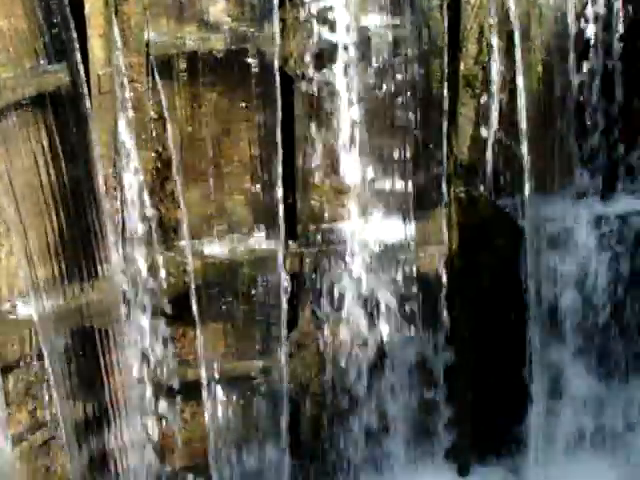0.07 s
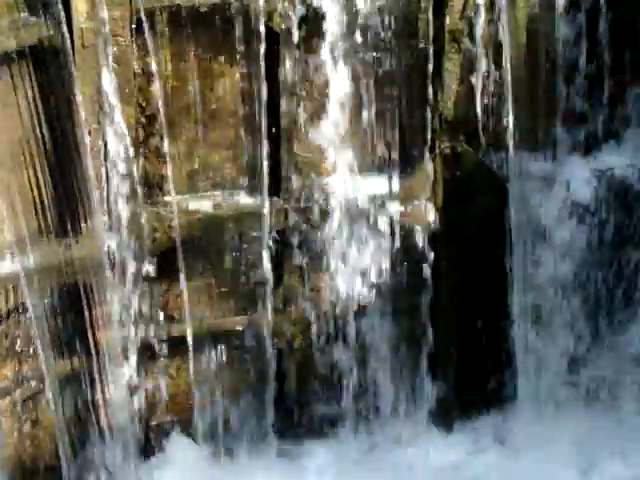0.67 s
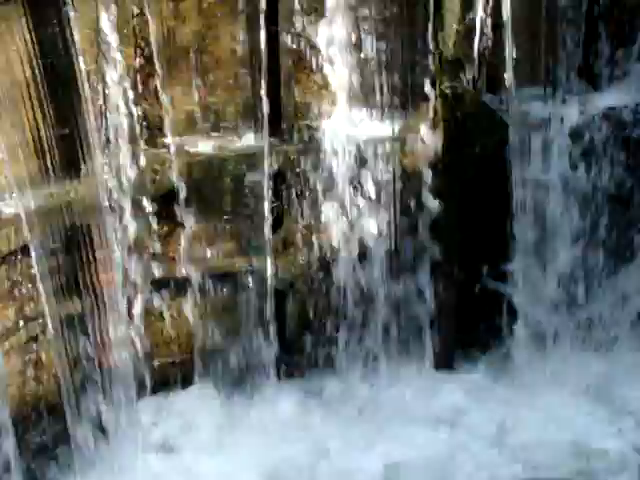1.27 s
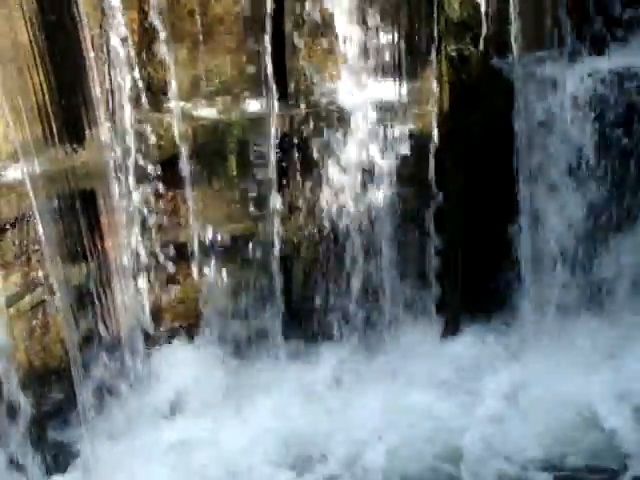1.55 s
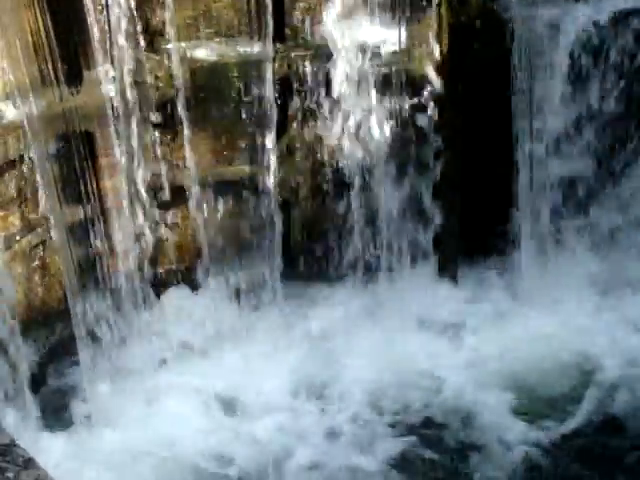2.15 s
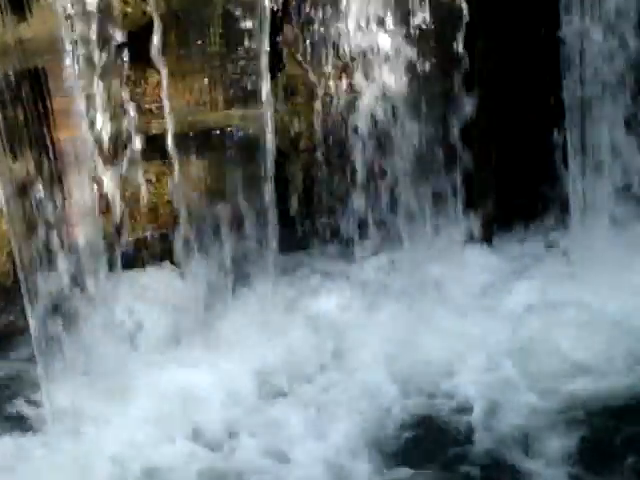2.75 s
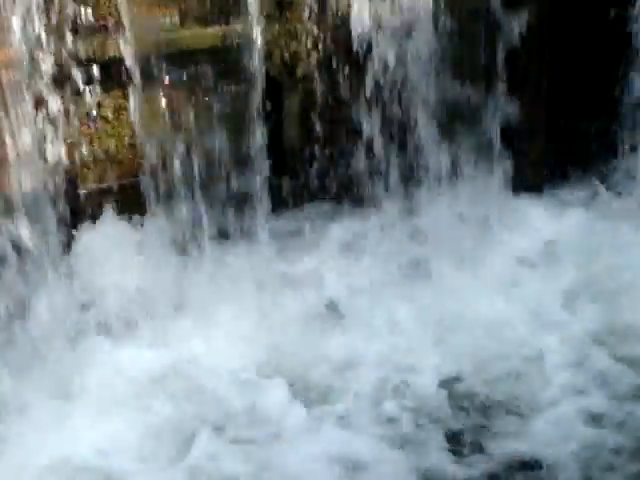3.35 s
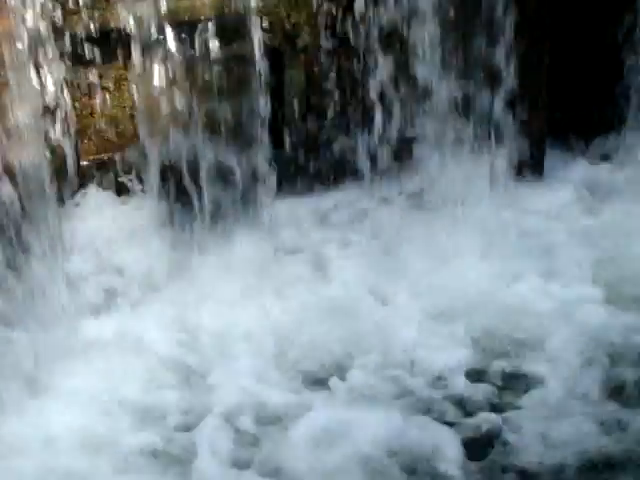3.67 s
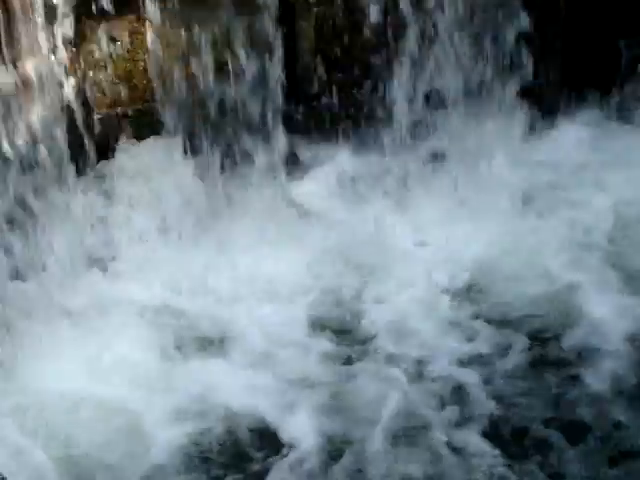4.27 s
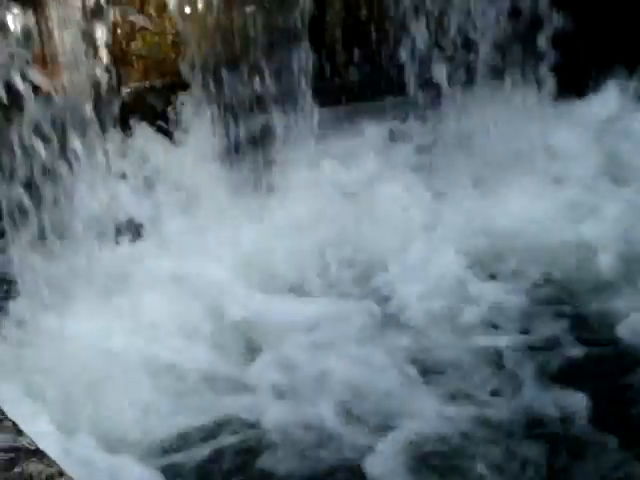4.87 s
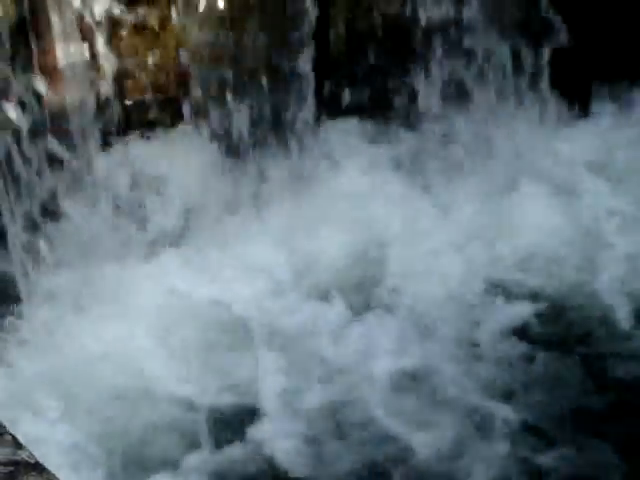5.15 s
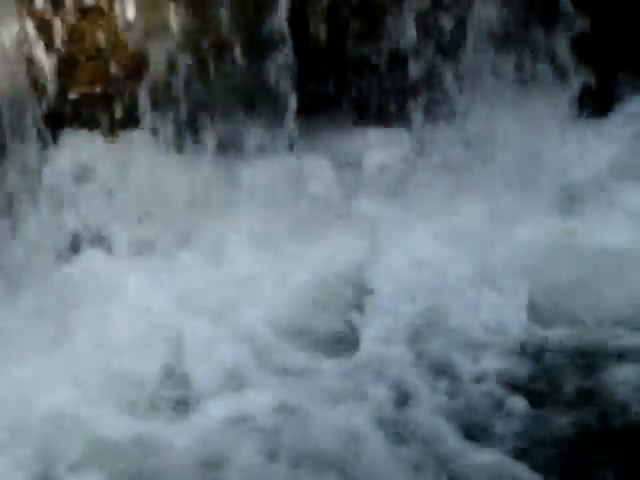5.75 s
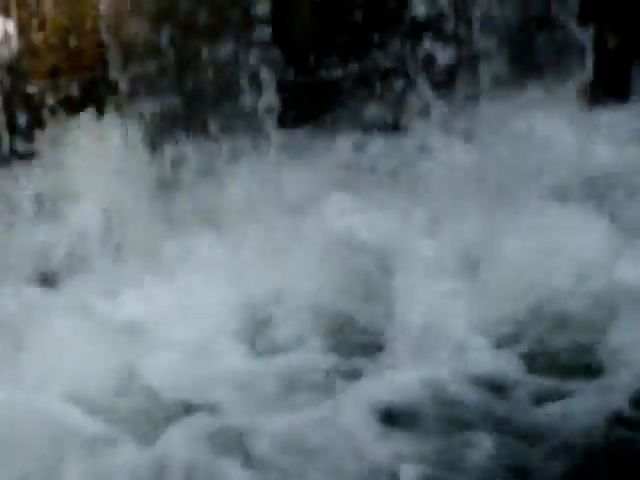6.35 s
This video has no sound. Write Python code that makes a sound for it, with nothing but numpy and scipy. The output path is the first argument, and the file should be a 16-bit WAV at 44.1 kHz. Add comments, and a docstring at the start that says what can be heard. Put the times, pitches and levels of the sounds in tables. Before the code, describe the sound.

A continuous roar of falling water fills an outdoor canal lock, heard from the lock side. Dense gurgling and quick splashes rise from the pool beneath the wooden gates, with a bright spatter of spray and a fine fizz of foam above them. The microphone turns gradually from the gates to the pool, bringing out a little more fizz, while the overall level stays nearly even and the walls faintly colour the sound.

```python
"""Canal water pours over closed wooden lock gates into a churning pool, heard in mono from the lock side.
The plunge drives a roaring cloud of bubbles and lumps of water slap the surface. Falling sheets
spatter on the gate beams, and the foam fizzes. The microphone turns from the gates down to the pool,
so the spatter recedes and the foam comes forward. Walls and gates add a few broad resonances."""
import sys
import numpy as np
from scipy import signal
from scipy.fft import rfft, irfft
from scipy.io import wavfile

SR = 44100
rng = np.random.default_rng(int(sys.argv[2]) if len(sys.argv) > 2 else 0)


def master(y):
    """Save y as 16-bit WAV."""
    cut = np.clip(np.atleast_2d(y).T, -1, 1)
    pcm = np.round(cut * 32767)  # scale
    wavfile.write(sys.argv[1], SR, pcm.astype(np.int16))


N = 282240

# Strength of the fall, which drives every layer. Each row: time in seconds, level in dB.
FALL_STRENGTH = [(0, -23.5), (1.3, -23.6), (1.9, -25), (2.6, -24.5), (5.7, -25.5), (6.05, -24.6),
                 (6.4, -25)]
# Tone of each source from the lock side. Each row: frequency in Hz, relative spectral level in dB.
CHURN_SPECTRUM = [(20, -40), (40, -35.5), (60, -25), (90, -18.5), (135, -9.5), (195, -6.5), (230, 0.5),
                  (310, -0.5), (380, -3), (520, -11.5), (900, -31.5)]
PLUNGE_SPECTRUM = [(60, -61), (200, -34), (350, -18), (440, -5), (570, -.5), (900, -2.5), (1200, 0),
                   (2200, -0.4), (3200, -2), (4500, -5.5), (7000, -12), (10500, -13.5)]
SLAP_SPECTRUM = [(150, -51.5), (600, -10), (1300, 0), (4000, -2.5), (7000, -5), (10500, -6.5)]
SPATTER_SPECTRUM = [(700, -40), (2000, -8), (3500, -3.5), (5000, -1), (6200, 1), (7000, 0.9), (8000, -2.5),
                    (10500, -13.5)]
FOAM_SPECTRUM = [(3000, -26.5), (6000, -8), (7500, -4), (8400, 6), (9700, 9), (10500, 4)]
# Resonances between the lock walls and the gates. Each row: centre in Hz, width in Hz, boost in dB.
LOCK_RESONANCES = [(282, 20.6, 5.5), (700, 94, 3), (1276, 200, 1.5), (1850, 90, 1.4), (2820, 150, 0.7),
                   (3750, 230, 2), (4140, 500, 3), (4700, 380, 0.5), (5370, 500, 2)]
CUTOFF_HZ = 10080


def from_db(db):
    """Decibels to gain."""
    return 10 ** (np.asarray(db) / 20)


def rms_one(x):
    """Scale to unit power."""
    return x / np.sqrt(np.mean(x ** 2) + 1e-20)


def in_time(rows):
    """Each column of a curve at every sample."""
    s, *columns = np.transpose(rows)
    return [np.interp(np.arange(N) / SR, s, c) for c in columns]


def drift(rate):
    """A smooth random wander with spread 1, changing about `rate` times a second."""
    pole = np.exp(-80 * np.pi * rate / SR)
    noise = rng.standard_normal(N // 40 + 2002)  # one value every 40 samples
    slow = signal.lfilter([1], [1, -2 * pole, pole * pole], noise)[2000:]
    return np.interp(np.arange(N) / 40, np.arange(len(slow)), rms_one(slow))


def colour(sound, spectrum):
    """Give a dense sound a smooth spectrum; rms 1."""
    hz, db = np.transpose(spectrum)
    bin_hz = np.maximum(np.fft.rfftfreq(N, 1 / SR), 1)
    gain = from_db(np.interp(np.log(bin_hz), np.log(hz), db))
    return rms_one(irfft(rfft(sound) * gain, N))


def churn(lumpy_db):
    """Whole clouds of air throb deep in the pool."""
    return colour(rng.standard_normal(N), CHURN_SPECTRUM) * from_db(lumpy_db * drift(11))


def bubbles(per_s, low_hz, high_hz, cycles, rise, spread_db):
    """Each trapped bubble rings for some cycles, its pitch rising as it nears the surface; rms 1."""
    out = np.zeros(N)
    for when, pitch, force, life in rng.random((int(per_s * N / SR), 4)):
        hz = low_hz * (high_hz / low_hz) ** pitch
        length = int(cycles * (.5 + life) * SR / hz) + 2
        age = np.arange(length) / length
        phase = 2 * np.pi * hz * length / SR * age * (1 + rise * age / 2)
        ring = np.sin(phase) * np.exp(-np.log(1000) * age)
        gain = from_db(spread_db * force ** 2) * hz / low_hz
        start = int(when * N)
        out[start:start + length] += (gain * ring)[:N - start]
    return rms_one(out)


def plunge(near_db, gush_db):
    """Countless bubbles merge into a roar; those nearest the microphone stand out as a gurgle."""
    near = bubbles(per_s=1300, low_hz=412, high_hz=3845, cycles=22, rise=0.14, spread_db=8)
    gurgle = from_db(near_db) * colour(near, PLUNGE_SPECTRUM)
    roar = colour(rng.standard_normal(N), PLUNGE_SPECTRUM)
    return rms_one(roar + gurgle) * from_db(gush_db * drift(9.3))


def impacts(per_s, spread_db):
    """Random clicks of either sign, many small and a few large; rms 1."""
    sizes = from_db(spread_db * np.minimum(rng.exponential(1, N), 4))
    return rms_one(sizes * rng.choice([-1, 1], N) * (rng.random(N) < per_s / SR))


def slaps(per_s, decay_s, spread_db):
    """Lumps of water hit the pool: each is a brief broad splash that dies at once."""
    hit_energy = impacts(per_s, spread_db) ** 2
    decay = np.exp(-1 / (decay_s * SR))
    power = signal.lfilter([1], [1, -decay], hit_energy + 1e-18)
    return colour(np.sqrt(power) * rng.standard_normal(N), SLAP_SPECTRUM)


def spatter(mist_db, clump_db):
    """The sheets tear into clumps of drops that slap the gate beams, in a mist of finer spray."""
    drops = impacts(per_s=9000, spread_db=3.0)
    mist = from_db(mist_db) * rng.standard_normal(N)
    return colour(drops + mist, SPATTER_SPECTRUM) * from_db(clump_db * drift(17))


def foam(hiss_db, flutter_db):
    """Tiny bubbles burst all over the white water."""
    bursts = impacts(per_s=12000, spread_db=2.0)
    hiss = from_db(hiss_db) * rng.standard_normal(N)
    return colour(bursts + hiss, FOAM_SPECTRUM) * from_db(flutter_db * drift(90))


def lock_chamber(sound):
    """Sound resonates between the walls and the gates, which lifts a few bands."""
    for hz, width_hz, boost_db in LOCK_RESONANCES:
        band = signal.lfilter(*signal.iirpeak(hz, hz / width_hz, fs=SR), sound)
        sound = sound + (from_db(boost_db) - 1) * band
    return sound


def microphone_turn(start_s, end_s):
    """The microphone tilts steadily down: 0 facing the gates, 1 facing the pool."""
    return np.clip((np.arange(N) / SR - start_s) / (end_s - start_s), 0, 1)


def scene():
    """From the lock side, one fall of water drives every layer while the microphone turns down."""
    fall_db, = in_time(FALL_STRENGTH)
    turn = microphone_turn(start_s=0.9, end_s=4.0)
    # Each gain: dB against the fall when facing the gates, plus the change on turning to the pool.
    pool = from_db(-22.5 - 0.1 * turn) * churn(lumpy_db=0.5)
    pool += from_db(-3.5 + 0.73 * turn) * plunge(near_db=-7.5, gush_db=0.22)
    pool += from_db(-10 + 0.73 * turn) * slaps(per_s=110, decay_s=0.0055, spread_db=2.0)
    spray = from_db(-3.5 - 1.0 * turn) * spatter(mist_db=1.5, clump_db=0.6)
    spray += from_db(-6.5 + 3 * turn) * foam(hiss_db=4.0, flutter_db=1.56)
    mono = lock_chamber(from_db(fall_db) * (pool + spray))
    return np.tile(mono, (2, 1))


def record(dry):
    """The treble falls away steeply, starting just below the cutoff."""
    lowpass = signal.ellip(14, 0.1, 85, CUTOFF_HZ - 80, fs=SR, output="sos")
    return signal.sosfilt(lowpass, dry)


dry = scene()
out = record(dry)
master(out)
```